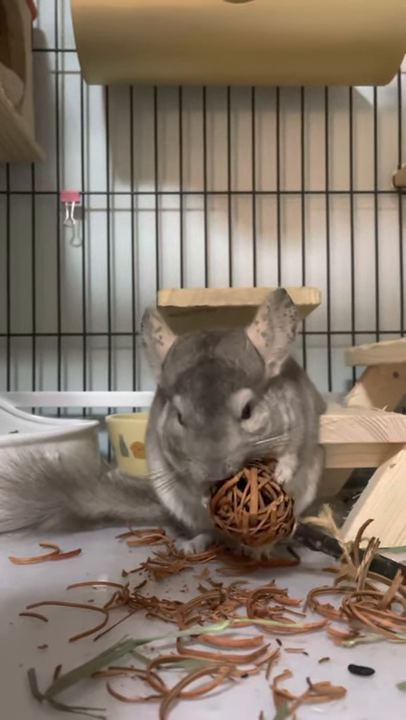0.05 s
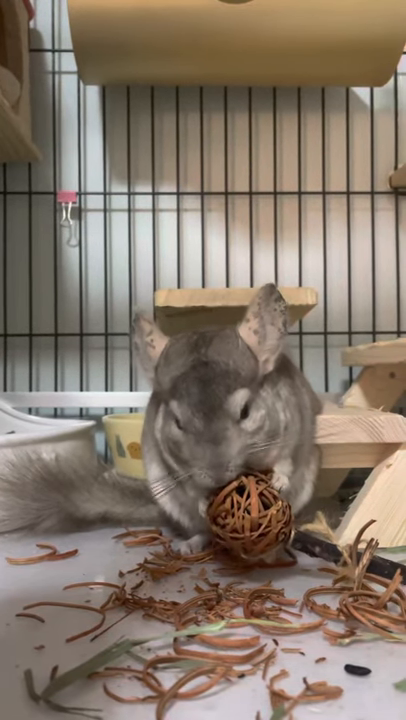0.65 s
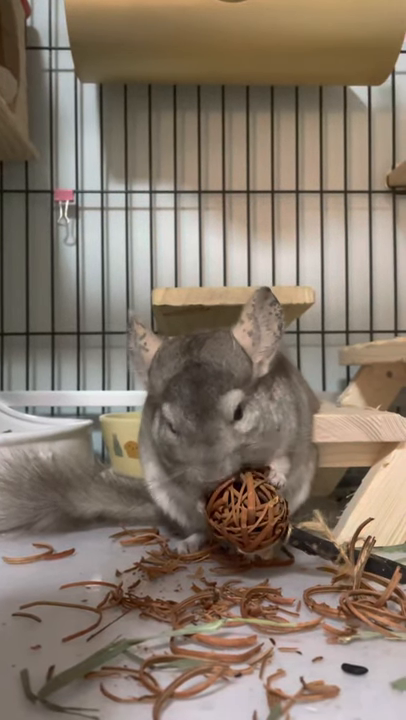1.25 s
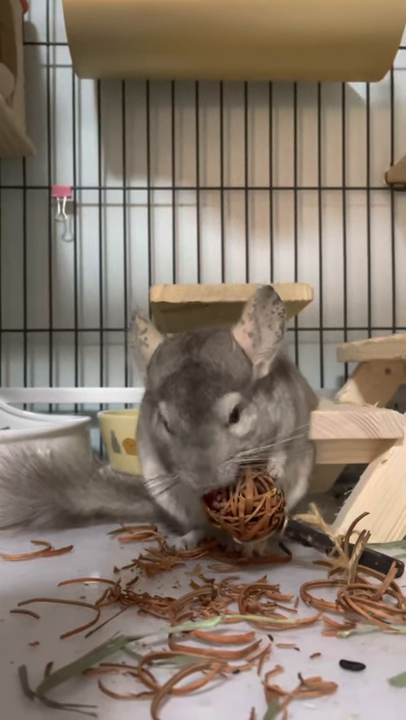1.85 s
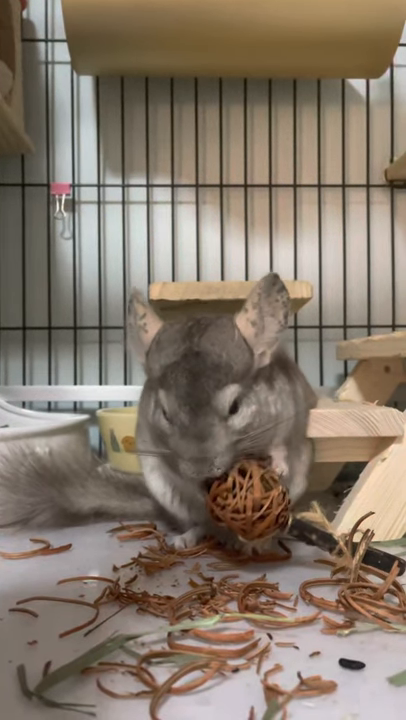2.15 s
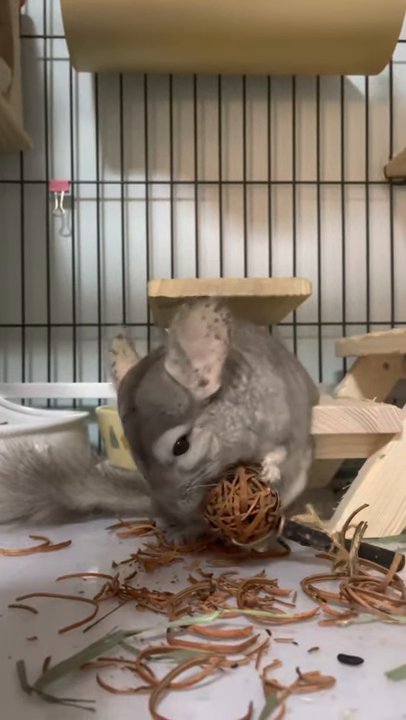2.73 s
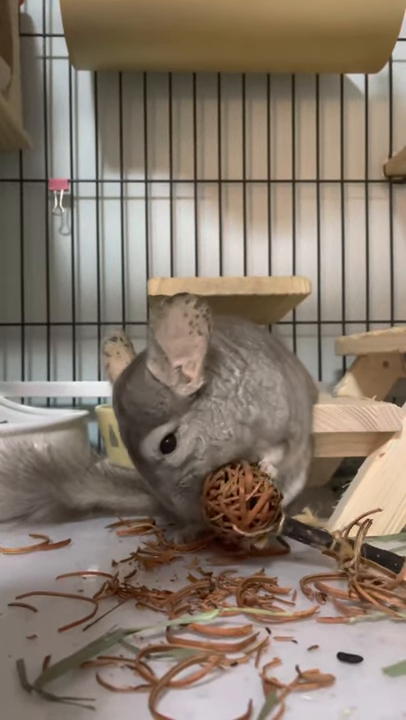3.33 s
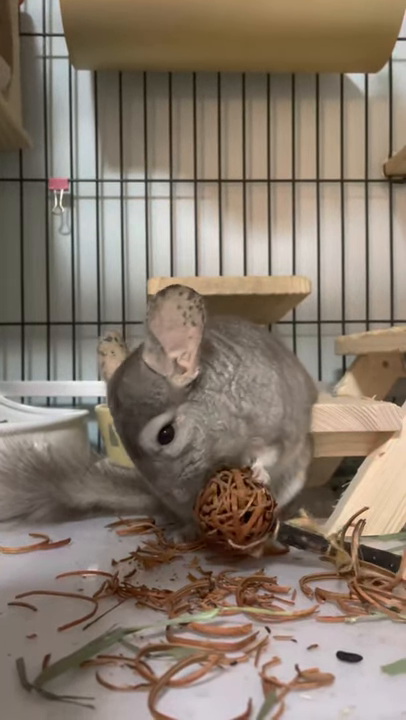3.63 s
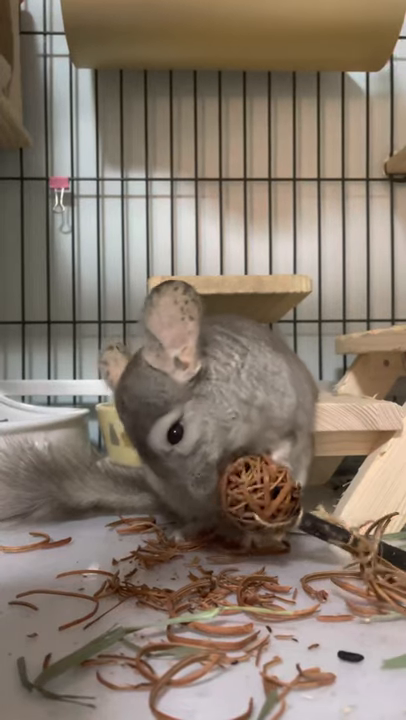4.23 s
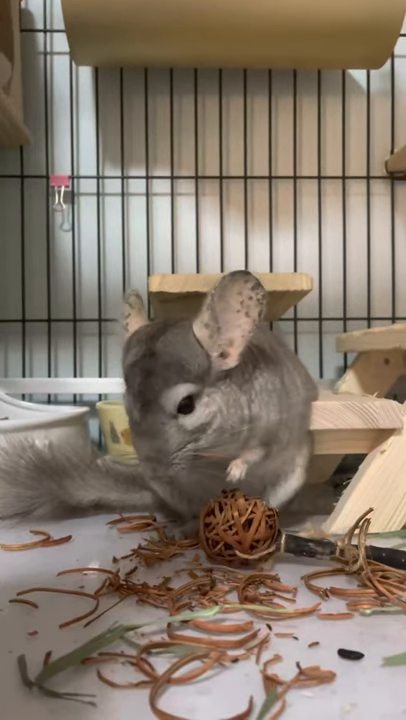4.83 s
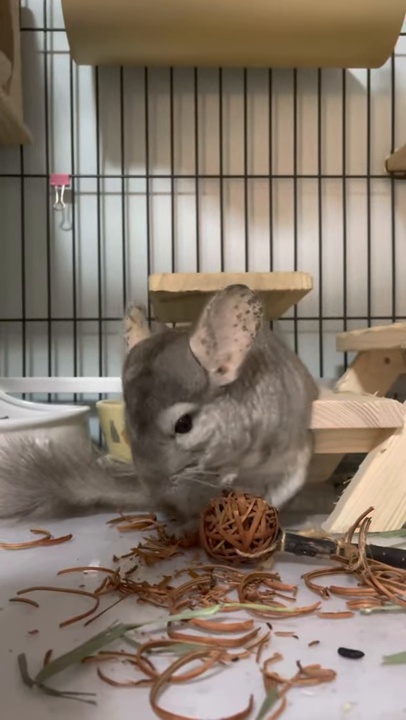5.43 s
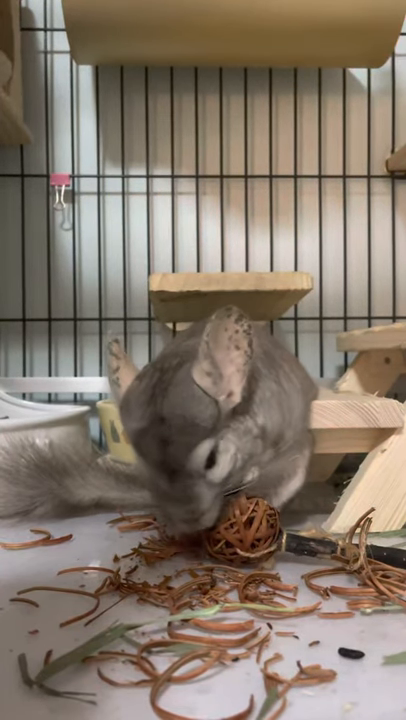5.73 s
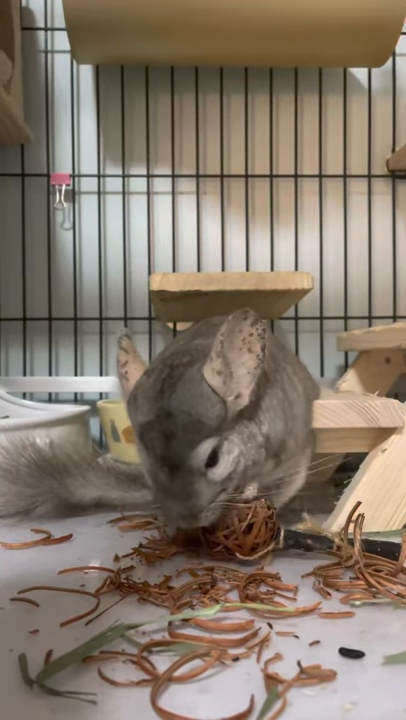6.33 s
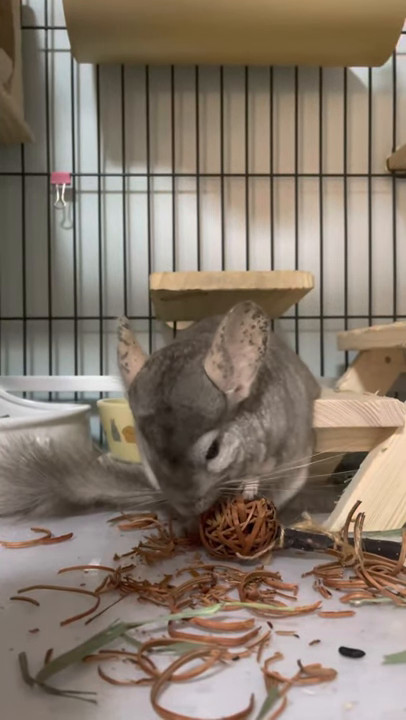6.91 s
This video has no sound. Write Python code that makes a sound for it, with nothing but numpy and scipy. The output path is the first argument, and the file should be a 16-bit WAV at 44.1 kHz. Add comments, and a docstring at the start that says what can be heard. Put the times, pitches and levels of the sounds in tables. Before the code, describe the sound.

A chinchilla gnaws a woven wicker ball in a wire cage. Small, crisp cracks, tooth ticks and scratchy rubbing come in irregular clusters. Past the middle, a strand snaps sharply and the ball bumps the floor tray with a low ring. A few more crunches follow, then the gnawing stops. A close microphone hears it all in a small room, over an appliance's faint hum and soft airflow.

```python
"""A chinchilla gnaws a woven wicker ball in a wire cage in a small room; an appliance hums and blows.
From the start strands rub, teeth nick the bark, and fibres crack and set the wicker ringing.
At 1.4 s the teeth rasp along a strand; from 2.2 s the ball now and then recoils with a knock.
At 4.4 s a strand snaps and the ball bumps the floor tray. After 6.2 s the gnawing dies away,
leaving the appliance. A close pair of microphone ports picks it all up."""
import sys
import numpy as np
from scipy import signal
from scipy.fft import rfft, irfft, next_fast_len
from scipy.io import wavfile

SR = 44100
rng = np.random.default_rng(int(sys.argv[2]) if len(sys.argv) > 2 else 0)


def inscribe(sig):
    """Save sig as 16-bit PCM at rate SR to the path in sys.argv[1].

    A 1-D sig is mono; a 2-D sig holds one channel per row.
    Samples are clipped to [-1, 1] before scaling.
    """
    pcm = np.round(np.clip(np.atleast_2d(sig).T, -1, 1) * 32767)
    wavfile.write(sys.argv[1], SR, pcm.astype(np.int16))


N = 311787
TIME = np.arange(N) / SR


def from_db(db):
    """Decibels to gain."""
    return 10 ** (np.asarray(db) / 20)


def unit_rms(x):
    """Scale to rms 1."""
    return x / np.sqrt(np.mean(x ** 2) + 1e-20)


def at_hz(points, hz):
    """Read a table on a log-frequency axis."""
    freqs_hz, values = np.transpose(points)
    return np.interp(np.log(hz), np.log(freqs_hz), values)


def colour(x, spectrum):
    """Filter by a table of freq_hz, gain_db."""
    size = next_fast_len(N)
    hz = np.maximum(np.arange(size // 2 + 1) * SR / size, 1)
    return irfft(rfft(x, size) * from_db(at_hz(spectrum, hz)), size)[..., :N]


def resonate(x, hz, width_hz):
    """Band-pass resonance with steep skirts."""
    edges_hz = np.clip([hz - width_hz / 2, hz + width_hz / 2], 10, .45 * SR)
    return signal.sosfilt(signal.butter(2, edges_hz, "band", fs=SR, output="sos"), x)


def lowpass(x, hz, order):
    """Cut the treble above hz."""
    return signal.sosfilt(signal.butter(order, hz, fs=SR, output="sos"), x)


def drift(per_s, size=2000):
    """Glide between random values of spread 1."""
    return np.interp(TIME * per_s, np.arange(size), rng.standard_normal(size))


# mains hum: harmonic, level_db
HUM = [(1, -44.5), (2, -53), (4, -62), (6, -67.5), (7, -73.5), (10, -77), (14, -69.5), (15, -81), (17, -79)]
# faint wavering tones: pitch_hz, width_hz, level_db
WHINES = [(126.8, 10, -61), (393.5, 1.5, -82), (495.6, 44, -85), (3378, 150, -88.5)]
# air noise spectrum: freq_hz, gain_db
AIR = [(24, -24.5), (42, 3), (75, 1), (105, 2.5), (175, 0), (228, 4.5), (258, -5.5), (560, -14.5),
       (1000, -23.5), (1250, -27.5), (1750, -38.5), (2400, -34.5), (4200, -49.5), (10700, -45),
       (14000, -65), (16000, -74)]
# part of the air noise that differs between the ports: freq_hz, gain_db
AIR_APART = [(60, -5.5), (130, -11), (200, -9.5), (450, 0.5), (1200, 3.5), (3000, 2.5), (6000, 1.5),
             (9000, -30.5)]


def appliance(mains_hz=60, hum_db=-2.5, waver_db=1.4, flutter_db=0.2391, air_db=-52.5):
    """Mains hum and faint whines over soft air noise; higher harmonics flutter more."""
    hum = whines = 0
    for harmonic, db in HUM:
        level_db = db + hum_db + waver_db * drift(per_s=5.5) + flutter_db * harmonic * drift(per_s=16)
        cycles = harmonic * mains_hz * TIME + rng.random()
        hum += from_db(level_db) * np.sqrt(2) * np.sin(2 * np.pi * cycles)
    for hz, width_hz, db in WHINES:
        whine = resonate(rng.standard_normal(N + SR), hz, width_hz)[SR:]
        whines += from_db(db) * unit_rms(whine)
    air = rng.standard_normal(N) + colour(rng.standard_normal((2, N)), AIR_APART)
    return hum + whines + from_db(air_db) * unit_rms(colour(air, AIR))


# turns and tugs of the ball: start_s, length_s, hollow_db, scratch_db, fizz_db
STROKES = [(0.0, 0.0021, -62, -67, -39), (0.13, 0.07, -80, -90, -61), (0.218, 0.12, -81, -99, -68.5),
           (0.418, 0.019, -90, -74, -60), (0.5, 0.06, -72, -77, -67.5), (0.767, 0.029, -75, -80.5, -52),
           (1.362, 0.03, -66, -57, -57.5), (1.394, 0.045, -64, -62, -66), (1.723, 0.085, -86, -77, -68.5),
           (1.906, 0.029, -72.5, -82, -66), (2.119, 0.017, -57, -68.5, -58), (2.172, 0.019, -59, -59, -64),
           (2.331, 0.099, -66, -78.5, -79.5), (2.435, 0.11, -79, -84, -64), (2.574, 0.038, -60, -70.5, -62),
           (2.737, 0.051, -67.5, -78, -68), (2.816, 0.093, -68, -71.5, -70), (2.945, 0.068, -80, -78, -75),
           (3.09, 0.054, -78.5, -82, -72), (3.184, 0.052, -74.5, -81.5, -67.5),
           (3.27, 0.037, -63, -71, -65), (3.473, 0.064, -61.5, -68, -60.5), (4.055, 0.017, -62, -64, -62),
           (4.155, 0.045, -69.5, -78, -55), (4.21, 0.07, -70.5, -73, -52), (4.263, 0.12, -86, -78.5, -58),
           (4.405, 0.058, -66.5, -70.5, -57.5), (4.447, 0.025, -59.5, -63.5, -64),
           (4.511, 0.044, -69, -66.5, -59), (4.583, 0.048, -58, -64.5, -59), (4.65, 0.067, -68.5, -74, -76),
           (5.765, 0.1, -68, -69, -64), (5.922, 0.068, -73.5, -70.5, -59),
           (6.113, 0.064, -65.5, -72, -67.5), (6.16, 0.058, -59.5, -62.5, -49)]


def stroke_gains(grip_s=.016, grip_share=.3, release_t60_s=(0.23, 0.25, 0.056)):
    """Envelopes of hollow ring, scratch and fizz: each stroke grips, holds and lets go."""
    power = np.zeros((3, N))
    for start_s, length_s, *levels_db in STROKES:
        on = (TIME >= start_s) & (TIME < start_s + length_s + max(release_t60_s))
        t = TIME[on] - start_s
        rise_s = grip_s + grip_share * length_s
        grip = np.sin(np.pi / 2 * np.minimum(t / rise_s, 1)) ** 2
        released_s = np.maximum(t - length_s, 0)
        for band, (db, t60_s) in enumerate(zip(levels_db, release_t60_s)):
            power[band, on] += (grip * from_db(db - 60 * released_s / t60_s)) ** 2
    return np.sqrt(power)


# spectra of hollow ring, scratch and fizz, one list each: freq_hz, gain_db
RUB_SPECTRA = [
    [(400, 3.5), (700, 6), (1050, 6), (1350, 5.5), (1750, -15), (3000, -64.5)],
    [(1400, -16), (1900, 3.5), (2550, 11.5), (3300, 2.5), (4100, -2.5), (5800, -8.5), (7300, -4.5),
     (9500, -33.5), (12500, -54.5)],
    [(6000, -14.5), (8300, -11.5), (10300, -1), (11300, -1.5), (12200, -28), (13500, -40.5), (16000, -63)],
]


def rubbing(gains, bands_db=(3.1, -0.2, -8.5), catches_per_s=700, spread_db=3, stutter_db=4):
    """Strands slide over each other in dense little catches of uneven size."""
    sizes = from_db(spread_db * np.minimum(rng.exponential(1, N), 3))
    catches = sizes * rng.choice([-1, 1], N) * (rng.random(N) < catches_per_s / SR)
    sliding = 0.17 * rng.standard_normal(N)
    friction = (catches + sliding) * from_db(stutter_db * drift(per_s=90))
    return sum(from_db(db) * gain * unit_rms(colour(friction, spectrum))
               for db, gain, spectrum in zip(bands_db, gains, RUB_SPECTRA))


# wicker resonances, one list per band (hollow, woody, middle, bright): pitch_hz, width_hz, level_db
WICKER = [
    [(1120, 550, 4.5), (680, 300, -0.5)],
    [(2185, 1900, 7), (3390, 610, -0.5)],
    [(4640, 2100, -2), (7080, 2060, 1.5)],
    [(8600, 1000, -2), (10340, 1400, 6), (15400, 1100, -4.5)],
]
# teeth nicking the bark: start_s, level_db
NICKS = [(0.010, -58), (0.168, -65), (0.1715, -61), (0.193, -64), (0.1993, -55), (0.252, -62),
         (0.2823, -68), (0.2855, -58.5), (0.328, -74), (0.343, -65), (0.366, -60), (0.37, -58),
         (0.380, -51.5), (0.400, -71), (0.434, -56), (0.5884, -55.5), (2.5255, -58), (2.564, -71),
         (2.808, -66), (2.9943, -74), (3.0045, -70), (3.2293, -74), (3.4723, -69), (4.237, -49),
         (4.295, -56), (4.364, -57.5), (5.503, -67), (6.138, -72)]


def nicks(fizz_gain, gain_db=-6.5, middle_db=-15, t60_s=.009, faint_per_s=30, size=440):
    """Teeth nick the bark and the wicker's upper resonances tick; faint nicks crowd in with the fizz."""
    rate_per_s = faint_per_s * np.minimum(fizz_gain / from_db(-68), 3)
    born = rng.random(N) < rate_per_s / SR
    faint_db = -70 + 8 * rng.uniform(-1, 1, N)
    faint_nicks = list(zip(TIME[born], faint_db[born]))
    grit = rng.standard_normal(N + size)
    fade = from_db(-60 * TIME[:size] / t60_s)
    out = np.zeros(N + size)
    for start_s, db in NICKS + faint_nicks:
        at = round(start_s * SR)
        chip = grit[at:at + size] * fade
        middle, bright = (sum(from_db(mode_db) * resonate(chip, hz, width_hz)
                              for hz, width_hz, mode_db in band[:2]) for band in WICKER[2:])
        tick = unit_rms(bright) + from_db(middle_db) * unit_rms(middle)
        out[at:at + size] += from_db(db + gain_db) * tick
    return lowpass(out[:N], hz=11600, order=8)


def fractures(impulse, length_s, splinter_db=-19, splinter_s=0.01, break_db=-1, break_s=.0005,
              cage_db=-9.5, cage_t60_s=0.011):
    """A fibre tears in tiny fractures, one clean break and trailing splinters; the cage reflects it."""
    size = len(impulse)
    t = np.arange(size) / SR
    torn = t / length_s
    swell = 1 - np.exp(-torn / 0.46)
    decay = np.exp(-torn ** 4) + from_db(splinter_db) * np.exp(-t / splinter_s)
    clean_break = np.roll(impulse, round(break_s * SR))
    tear = unit_rms(rng.standard_normal(size) * swell * decay) + from_db(break_db) * unit_rms(clean_break)
    # the head keeps moving, so every crack meets other reflections
    reflections = rng.standard_normal((2, size)) * from_db(-60 * t / cage_t60_s)
    paths = unit_rms(impulse) + from_db(cage_db) * unit_rms(reflections)
    return signal.fftconvolve(tear[None], paths, axes=1)[:, :size]


def wicker_ring(impulse, band, strand_modes, spread_hz=130, spread_db=2, tick_db=-10):
    """One band's ring: each fibre shifts and reweights the modes; a broad tick fills the valleys."""
    shift_hz = rng.uniform(-spread_hz, spread_hz)
    ring = 0
    for hz, width_hz, db in band + strand_modes:
        gain = from_db(db + spread_db * rng.standard_normal())
        ring += gain * unit_rms(resonate(impulse, hz + shift_hz, width_hz))
    centre_hz = np.mean([hz for hz, _, _ in band[:2]])
    tick = resonate(impulse, centre_hz, centre_hz / 2)
    return unit_rms(ring) + from_db(tick_db) * unit_rms(tick)


# fibres cracking: start_s, length_s, pitch_hz, hollow_db, woody_db, middle_db, bright_db
CRACKS = [(0.062, 0.00048, 3070, -46, -48.5, -41.5, -33.5), (0.0968, 0.0038, 2770, -56, -48.5, -44, -37.5),
          (0.5255, 0.00049, 2700, -65, -54, -51, -48), (0.7824, 0.0015, 3200, -65, -65.5, -52, -47),
          (0.7884, 0.0026, 3180, -54.5, -51, -48.5, -44), (1.782, 0.00017, 2740, -52, -53.5, -47.5, -41),
          (1.823, 0.0029, 2830, -68, -73, -56, -46), (1.9455, 0.0018, 2510, -64, -69, -62.5, -59),
          (2.136, 0.0028, 2500, -47.5, -71, -55.5, -60), (2.171, 0.00037, 2380, -55, -45.5, -42.5, -46.5),
          (2.463, 0.0049, 2970, -63, -64, -62.5, -64), (2.598, 0.0035, 2600, -62, -60, -73, -65),
          (2.634, 0.0011, 2420, -69, -57, -72, -76), (3.0287, 0.006, 3140, -55, -57, -53, -47.5),
          (3.2915, 0.0011, 2470, -65, -60, -56, -60), (3.297, 0.0014, 2670, -66, -58, -60, -62),
          (3.318, 0.00072, 2500, -63, -65, -63, -63), (3.4963, 0.0043, 3150, -46, -45.5, -39, -33),
          (3.772, 0.0012, 2630, -61, -68, -72.5, -61), (4.0694, 0.0012, 2300, -52.5, -49.5, -46, -49),
          (4.179, 0.0033, 2780, -75, -64, -59.5, -72), (4.246, 0.00093, 2900, -64, -61, -57, -51),
          (4.2543, 0.0012, 2730, -64, -51.5, -45.5, -43), (4.3925, 0.0055, 2170, -39.5, -40.5, -35.5, -38),
          (4.399, 0.0016, 2700, -50, -39, -36.5, -31.5), (4.457, 0.012, 2750, -48, -55, -65, -67),
          (4.531, 0.0007, 2600, -49, -54, -41.5, -46), (4.546, 0.0009, 2900, -70, -76, -73, -60),
          (4.6177, 0.0015, 2400, -62, -53, -48.5, -55), (4.651, 0.0026, 2620, -74, -73, -60, -56),
          (4.684, 0.0012, 2030, -52.5, -57, -73, -71), (4.785, 0.002, 3000, -51, -76, -57.5, -54),
          (4.8365, 0.002, 2240, -54, -56.5, -68, -69), (5.3655, 0.001, 2900, -55.5, -66, -67, -60),
          (5.778, 0.0018, 2200, -60, -50.5, -56, -64), (5.783, 0.0042, 2330, -50.5, -65, -55.5, -59),
          (5.862, 0.0081, 2250, -45, -47, -47, -48), (5.8897, 0.0008, 2600, -70, -68, -61, -59),
          (5.942, 0.0023, 2100, -56, -67, -60, -62), (5.9828, 0.00031, 2420, -48, -56, -45, -37),
          (5.989, 0.0047, 2570, -57, -58, -44, -56)]
# harder cracks reach higher into the treble: bright_db, cutoff_hz
CRACK_CUTOFF = [(-46.5, 10360), (-45, 12800)]


def cracks(gain_db=-13.5, overtone_ratio=2.35, size=1500):
    """Fibres crack between the teeth and set the strand and the wicker ringing."""
    impulse = signal.unit_impulse(size)
    out = np.zeros((2, N + size))
    for start_s, length_s, pitch_hz, *levels_db in CRACKS:
        tear = fractures(impulse, length_s)
        # the strand's own modes, laid out as WICKER
        strand = [[], [(pitch_hz, 1500, 18)], [(pitch_hz * overtone_ratio, 2000, -4)], []]
        crack = 0
        for band, strand_modes, db in zip(WICKER, strand, levels_db):
            ring = wicker_ring(impulse, band, strand_modes)
            ringing = signal.fftconvolve(tear, ring[None], axes=1)[:, :size]
            crack += from_db(db + gain_db) * unit_rms(ringing)
        cutoff_hz = np.interp(levels_db[-1], *np.transpose(CRACK_CUTOFF))
        at = round(start_s * SR)
        out[:, at:at + size] += lowpass(crack, cutoff_hz, order=8)
    return out[:, :N]


# teeth skidding: start_s, length_s, pitch_hz, level_db
RASPS = [(1.359, 0.093, 3950, -63)]


def rasp(slips_per_s=4000, width_hz=3400):
    """Teeth skid along a strand in quick slips that swell and fade as an even rustle."""
    slips = rng.standard_normal(N) * (rng.random(N) < slips_per_s / SR) + 1e-18
    out = np.zeros(N)
    for start_s, length_s, hz, db in RASPS:
        swell = np.sin(np.pi * np.clip((TIME - start_s) / length_s, 0, 1))
        rustle = resonate(resonate(slips, hz, width_hz), hz, width_hz)
        out += from_db(db) * swell * unit_rms(rustle)
    return out


def struck(blows, modes):
    """Each blow rings a body's modes as decaying sines."""
    out = np.zeros(N)
    for start_s, blow_db in blows:
        on = (TIME >= start_s) & (TIME < start_s + 1)
        t = TIME[on] - start_s
        for hz, mode_db, t60_s in modes:
            envelope = from_db(blow_db + mode_db - 60 * np.minimum(t / t60_s, 4))
            out[on] += envelope * np.sin(2 * np.pi * hz * t)
    return out


# recoils of the ball: start_s, level_db
KNOCKS = [(2.172, -60), (4.392, -50.5), (5.99, -57.5), (6.213, -57)]
# modes of the ball: pitch_hz, level_db, t60_s
BALL_MODES = [(450, -16, 0.037), (665, -20.5, .035), (880, 4, 0.034), (1163, 9, 0.061), (1430, -15.5, .018),
              (2250, 5, 0.02)]


def ball_knocks():
    """The whole ball recoils with a knock when a strand gives way."""
    return struck(KNOCKS, BALL_MODES)


# ball hitting the floor: start_s, level_db
BUMPS = [(4.399, -41.5), (4.412, -42.5), (4.431, -43), (4.459, -51)]
# modes of the floor tray: pitch_hz, level_db, t60_s
TRAY_MODES = [(122.3, 3, 0.47), (152, -3, 0.11), (192, -4.5, 0.056), (235.3, -1, 0.2), (288, -12, 0.15),
              (490, -13, 0.14), (673, -14, 0.18), (1140, -23, .035)]


def tray_bumps():
    """The ball bumps the cage floor and the tray rings low."""
    return struck(BUMPS, TRAY_MODES)


def room(x, tail_db=-13, t60_s=0.145, lows_db=5.5, first_echo_s=0.0012):
    """Add the small room's short tail, fuller in the lows."""
    t = np.arange(SR // 2) / SR
    scatter = rng.standard_normal(len(t)) + rng.standard_normal((2, len(t)))
    decay = from_db(-60 * t / t60_s) * (t > first_echo_s)
    echoes = from_db(tail_db) * unit_rms(scatter * decay) / np.sqrt(len(t))
    echoes += from_db(lows_db) * lowpass(echoes, hz=3500, order=1)
    echoes = lowpass(echoes, hz=11300, order=12)  # dull tail, no treble above about 11 kHz
    return x + signal.fftconvolve(x, echoes, axes=1)[:, :N]


def scene():
    """Gnawing in the room, the ball bumping the tray, the appliance behind."""
    gains = stroke_gains()
    gnawing = cracks() + ball_knocks() + rasp() + rubbing(gains) + nicks(fizz_gain=gains[-1])
    return room(gnawing) + tray_bumps() + appliance()


# left port's phase ahead of the right: freq_hz, lead_rad
PORT_PHASE = [(60, .2), (120, .1), (200, -.1), (330, -.7), (600, -2.4), (1200, -1.7), (2500, -2.4),
              (3500, -1.5), (4650, -2.3), (5300, -.8), (6000, 0), (7200, 1.3), (8200, 2.6), (9700, 3.5),
              (12000, 6.0)]
# left port's level over the right: freq_hz, balance_db
PORT_BALANCE = [(60, -0.4), (200, 0), (400, 2.5), (750, 4.5), (1300, 3), (2300, -0.5), (5000, -0.5),
                (9000, -0.2)]


def record(dry, cutoff_hz=16460, fade_s=.006, pad=4096):
    """Two ports hear each pitch with their own phase and level; the top is cut and the ends fade."""
    padded = np.pad(dry, [(0, 0), (pad, pad)], "reflect", reflect_type="odd")
    size = next_fast_len(padded.shape[1])
    hz = np.maximum(np.arange(size // 2 + 1) * SR / size, 1)
    side = np.array([[.5], [-.5]])
    ports = from_db(side * at_hz(PORT_BALANCE, hz)) * np.exp(1j * side * at_hz(PORT_PHASE, hz))
    heard = irfft(rfft(padded, size) * ports, size)
    top_cut = signal.ellip(10, .1, 80, cutoff_hz, fs=SR, output="sos")
    heard = signal.sosfilt(top_cut, heard)[:, pad:pad + N]
    edge_s = np.minimum(TIME, TIME[-1] - TIME)
    return heard * np.minimum(edge_s / fade_s, 1)


dry = scene()
out = record(dry)
inscribe(out)
```